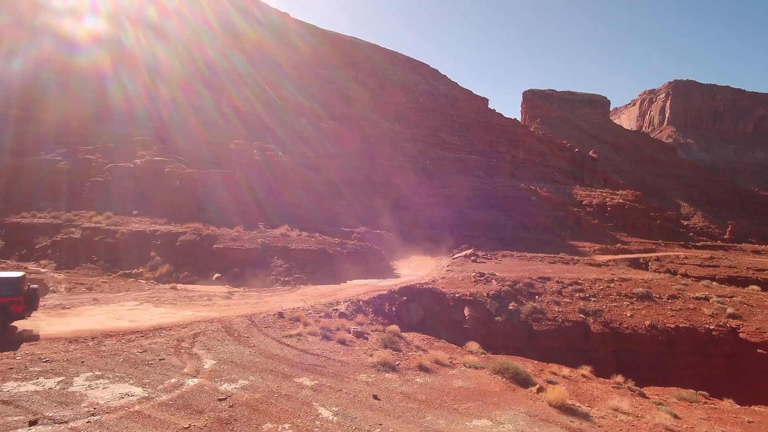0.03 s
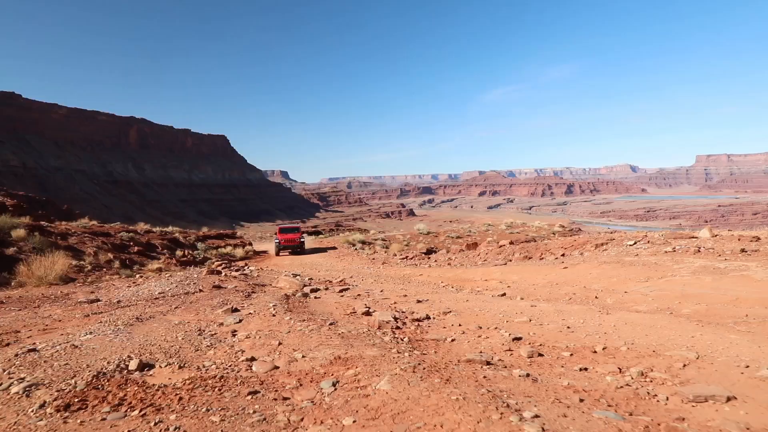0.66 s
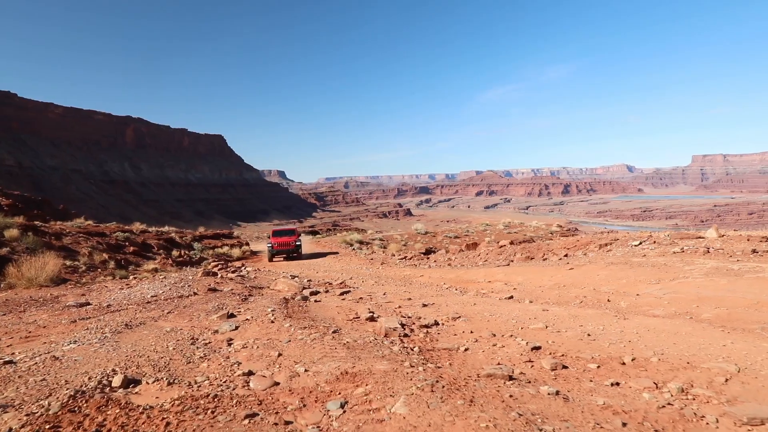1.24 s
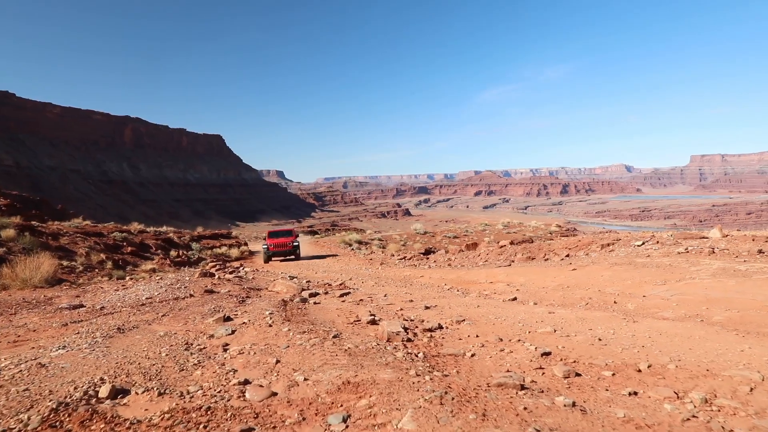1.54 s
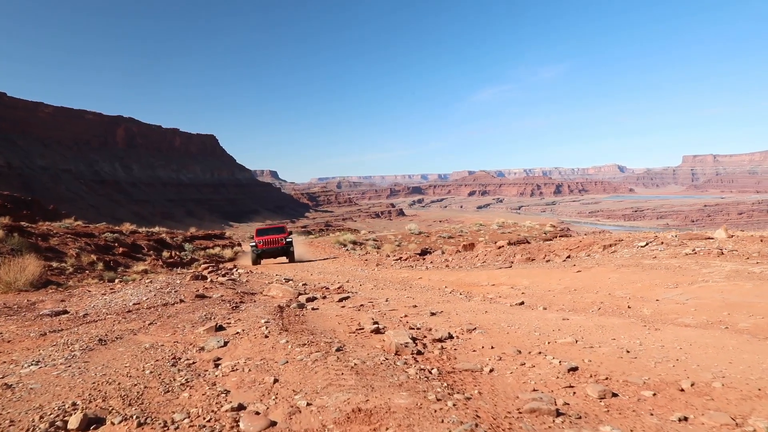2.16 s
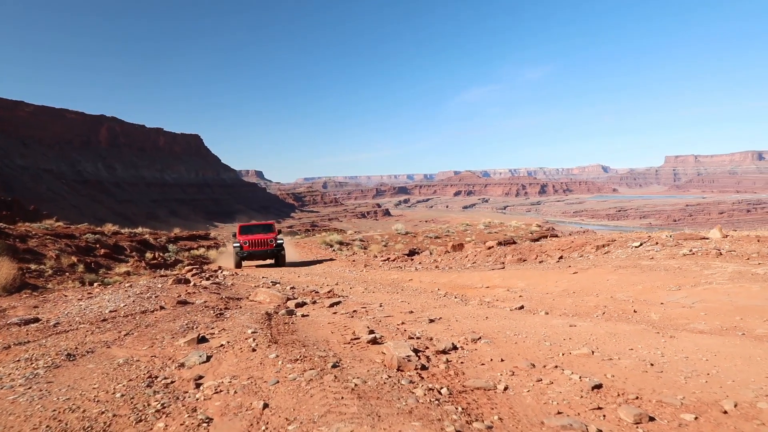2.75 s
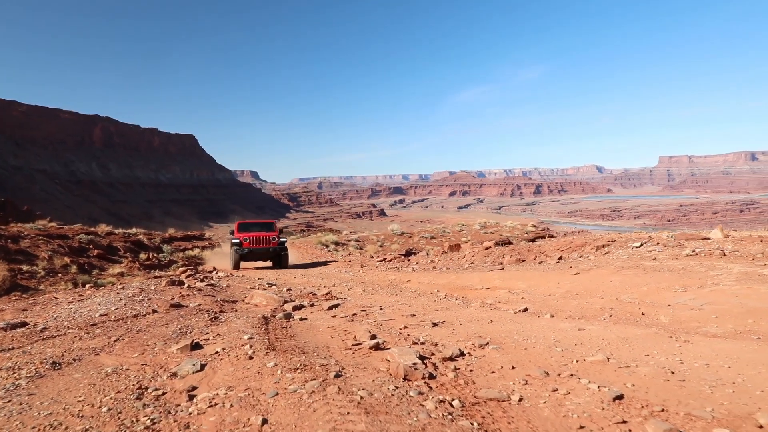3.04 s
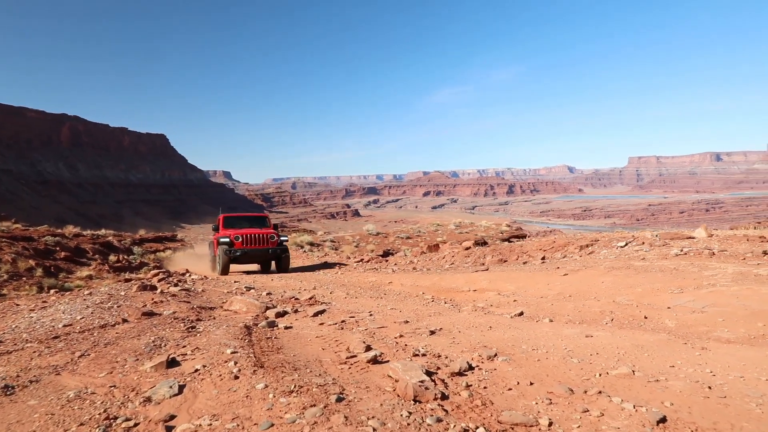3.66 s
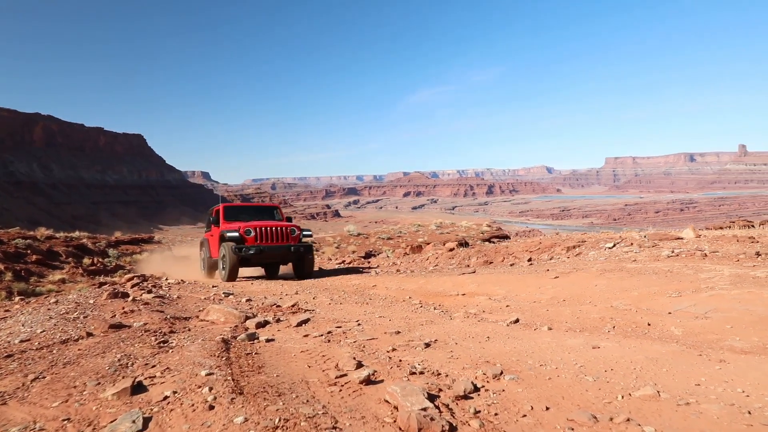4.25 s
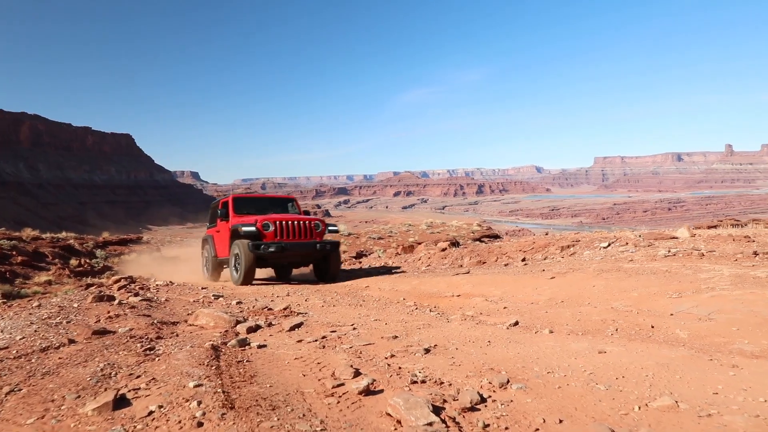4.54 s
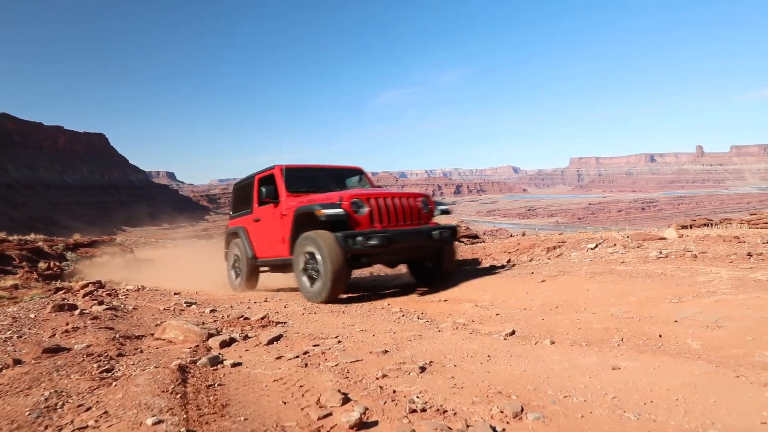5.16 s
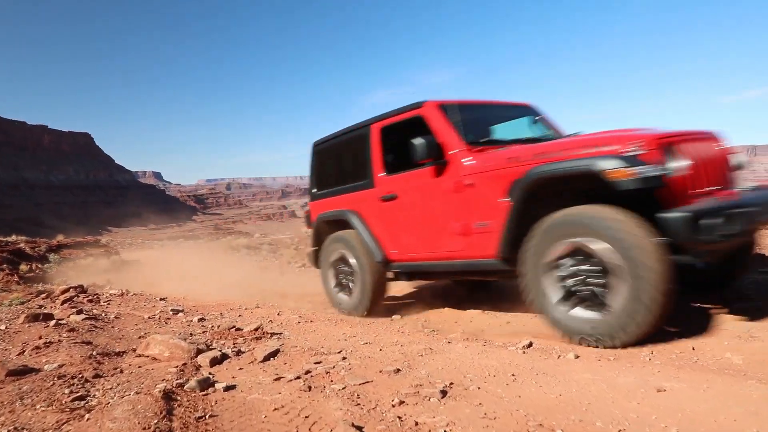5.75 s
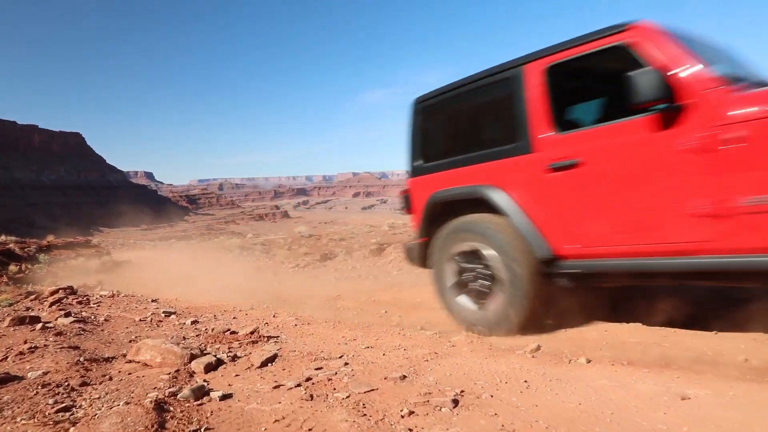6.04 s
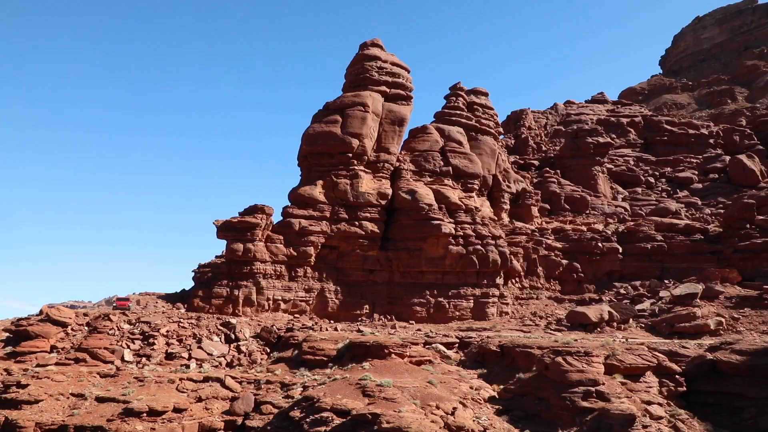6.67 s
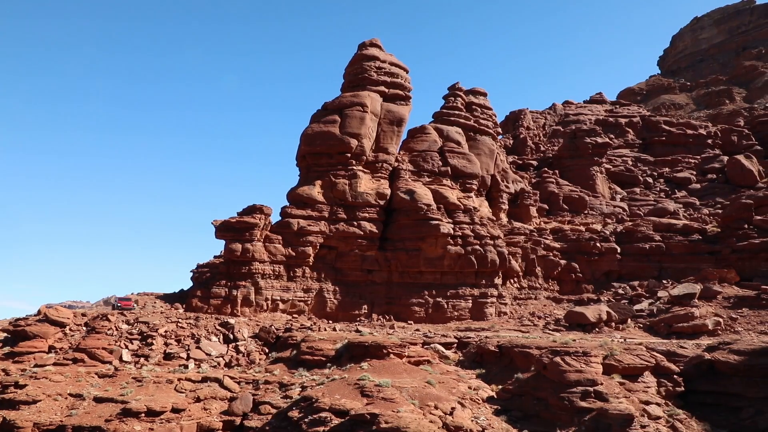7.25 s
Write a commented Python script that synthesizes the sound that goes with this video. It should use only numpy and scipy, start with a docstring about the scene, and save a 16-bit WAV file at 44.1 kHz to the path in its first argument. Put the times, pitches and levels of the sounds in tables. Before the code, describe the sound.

Gravel crunches and stones pop louder as an off-road vehicle hums up and drives close by, then everything cuts to near silence.

```python
"""A stony desert trail. A four-wheel-drive comes up and passes close: tyres thud, crush gravel and pop
stones over a surging engine hum, a singing intake and a hiss of sand; jolts ring the chassis.
Distance and loose ground set the tyre levels. While it is far off, something scuffs the grit nearby.
The drive-by starts and stops abruptly. A still canyon follows, with faint ticks and the soft bumps
of a hand on a camera body."""
import sys
import numpy as np
from scipy import signal
from scipy.fft import rfft, irfft, next_fast_len
from scipy.io import wavfile
from scipy.ndimage import uniform_filter1d, map_coordinates

SR = 44100
rng = np.random.default_rng(int(sys.argv[2]) if len(sys.argv) > 2 else 0)


def transcribe(u):
    """Save the signal u as a 16-bit wav file named by the first command-line argument.

    u: samples, shape (n,) or (channels, n), limited to [-1, 1]; the rate is SR.
    q: integer samples, one column per channel.
    """
    v = np.clip(np.atleast_2d(u).T, -1, 1)
    q = np.round(v * 32767).astype(np.int16)
    wavfile.write(sys.argv[1], SR, q)


N = 326340

START_S, STOP_S = 0.740, 6.747
SPEED_M_PER_S, CLOSEST_M, PASS_S = 4.93, 2.69, 6.01  # straight line, steady speed
TAIL_TURN_S = 0.25  # side-on to tail-on

# Canyon air spectrum: freq_hz, gain_db
AIR_EQ = [(20, -15.5), (90, 7), (230, -10), (370, 0.5), (520, -5), (800, -19), (930, -10.5), (1350, -13.5),
          (1700, -13.5), (2550, -13.5), (3400, -27.5), (5800, -39), (6700, -37), (7400, -33), (8200, -41),
          (11000, -37), (15000, -53)]
# Low wind spectrum: freq_hz, gain_db
BREEZE_EQ = [(12, -13), (25, -5), (45, 0), (95, 0.5), (140, 2.5), (300, -36.5)]
# Faint tones on the trail: pitch_hz, width_hz, level_db
TRAIL_TONES = [(2490, 150, -58), (4200, 200, -70)]
# Engine speed: time_s, firing_hz
REVS = [(0.76, 65), (1.6, 67.2), (2.55, 67.46), (2.95, 71.96), (3.25, 75.67), (3.95, 69.26), (4.6, 68.07),
        (4.85, 65.13), (5.4, 60.83), (5.87, 61.55), (5.96, 60.45), (6.03, 58), (6.08, 54.9), (6.14, 54.5),
        (6.22, 57.32), (6.35, 57.85), (6.42, 56.03), (6.52, 54.7), (6.6, 55.8), (6.72, 59)]
# Surge of the firing note: time_s, level_db
SURGE = [(0.76, -52), (1.19, -48), (1.37, -65), (1.47, -44), (1.72, -59), (1.95, -47), (2.5, -53),
         (3.02, -40), (3.33, -56), (3.55, -43.5), (3.93, -45), (4.68, -38), (4.73, -46), (4.89, -34.5),
         (4.97, -44), (5.11, -31), (5.14, -43), (5.36, -32), (5.51, -45), (5.85, -28), (6.07, -47),
         (6.22, -30), (6.52, -49), (6.72, -32)]
# Exhaust overtones: order, front_db, side_db, rear_db
EXHAUST_ORDERS = [(2, -16.5, -13, -2.5), (3, -15, 2, 2.5), (4, -11.5, 6, -13), (5, -19.5, -9, -4.5)]
# Exhaust booms: peak_s, decay_s, level_db
EXHAUST_BOOMS = [(1.05, 0.044, -47), (2.2, 0.2, -45.5), (2.88, 0.13, -44), (4.86, 0.05, -34.5)]
# Intake note: time_s, level_db
INTAKE_LEVEL = [(0.76, -52), (2.6, -47), (3.2, -33), (3.5, -49), (4.1, -37.5), (4.45, -39), (4.66, -34),
                (5.15, -35.5), (5.4, -37), (5.8, -50)]
# Thin whistle: time_s, pitch_hz, level_db
WHISTLE_PATH = [(0.78, 5590, -64), (0.92, 5630, -64), (1.02, 5630, -67), (1.42, 5600, -76.5),
                (1.55, 5590, -63), (1.95, 5535, -64), (2.08, 5590, -67), (2.25, 5620, -72),
                (2.38, 5625, -66), (2.58, 5565, -67), (2.95, 5540, -68), (3.5, 5595, -63), (4.1, 5520, -64),
                (6.4, 5530, -67), (6.55, 5510, -60)]
# Looseness of the ground, heard as hiss: time_s, spray_db
LOOSE_GROUND = [(0.76, -56.5), (0.95, -59), (1.2, -57.5), (1.9, -57.5), (2.1, -52), (2.45, -53),
                (2.85, -51.5), (3.05, -48.5), (3.35, -48.5), (3.85, -48.5), (4.15, -44.5), (5.0, -43),
                (5.2, -43), (5.85, -42.5), (6.12, -46), (6.32, -43.5), (6.46, -47.5), (6.74, -43.5)]
# Thudding from rocks in the track: time_s, gain_db
ROCK_GAIN = [(1.75, 0.5), (2.05, 3), (3.5, -2), (4.4, -1), (4.8, 1), (5.6, 1)]
# Tyre carcass spectrum: freq_hz, gain_db
THUD_EQ = [(10, -53), (24, -20), (45, -18), (62, -11), (90, -1), (125, 0), (180, 2), (270, -1.5), (380, -1),
           (520, -3.5), (900, -25), (3000, -120)]
# Far gravel spectrum: freq_hz, gain_db
GRAVEL_FAR_EQ = [(15, -57), (150, -36.5), (330, -1.5), (450, -1.5), (620, 5), (790, 1.5), (960, 6.5),
                 (1400, 1), (1800, -11), (2300, -7.5), (3000, -23), (6000, -44), (12000, -120)]
# Near gravel spectrum: freq_hz, gain_db
GRAVEL_NEAR_EQ = [(15, -45), (150, -17.5), (330, -8.5), (460, -3.5), (660, 1.5), (830, -3), (1000, -2.5),
                  (1400, 0), (1800, -1), (2080, -9), (2450, -20), (3000, -13.5), (6000, -66), (12000, -120)]
# Grit spectrum: freq_hz, gain_db
GRIT_EQ = [(100, -78), (1200, -25.5), (2000, 2), (2500, 5.5), (2850, 1), (3300, 1), (3900, -2.5),
           (4400, -5), (5200, -18.5), (7000, -17), (16000, -82)]
# Far sand spectrum: freq_hz, gain_db
SAND_FAR_EQ = [(300, -101), (3000, 0), (4800, 0), (5400, -5.5), (6200, -5), (6750, -1), (7400, -2),
               (8500, -2), (9200, 2), (9900, 0.5), (10500, 1), (12200, -10), (13600, -13), (15600, -19.5)]
# Near sand spectrum: freq_hz, gain_db
SAND_NEAR_EQ = [(300, -58), (3000, -3), (4800, -2.5), (5500, -6.5), (7400, -3.5), (10000, -3.5),
                (11200, -4.5), (12400, -12), (15600, -27)]
# Pebbles and grit landing: start_s, level_db, low_hz, high_hz
PEBBLE_TICKS = [(0.8145, -34, 2500, 11000), (1.475, -34, 1500, 7000), (1.506, -30, 1800, 8500),
                (1.828, -34.5, 2000, 6000), (2.146, -31.5, 1710, 3570), (2.635, -34, 1500, 7000),
                (3.667, -33, 1800, 3400), (4.121, -27, 1800, 3600), (4.167, -28, 1700, 4200),
                (4.775, -28.5, 9300, 13400), (5.417, -17, 1300, 2800), (5.487, -26, 2000, 4500),
                (5.567, -27, 2204, 4000), (6.077, -25, 2000, 4400), (6.085, -30, 6464, 13000),
                (6.297, -37, 7500, 11000), (6.426, -29, 2500, 7000), (6.769, -66, 7410, 11500),
                (6.898, -68, 6800, 10500), (6.963, -61, 6200, 11000), (7.042, -64, 6500, 10800),
                (7.121, -56, 6200, 11500), (7.127, -60, 6200, 11500), (7.333, -65, 6300, 9500)]
# Stones snapping from under the tread: start_s, level_db, pitch_hz, rattle_db
STONE_POPS = [(0.815, -11.5, 1320, -47), (1.229, -18, 1080, -38), (1.5786, -18, 840, -47),
              (2.2657, -15, 890, -28), (2.499, -12, 1200, -36), (2.6371, -14, 1170, -38),
              (3.1905, -17, 840, -31), (3.6368, -3.5, 626, -32), (3.979, -11, 1110, -43),
              (3.9932, -7, 950, -43), (4.1203, -12, 1120, -30), (4.3821, -6, 1300, -47),
              (4.41, -11, 980, -47), (4.553, -7.5, 790, -25.5), (4.6005, -10, 1060, -41),
              (4.6759, -8, 597, -29), (4.79, -3.5, 1040, -45), (4.8214, -10, 575, -45),
              (4.96, -11, 1300, -40), (5.0524, -4.5, 1060, -34), (5.076, -7, 900, -22),
              (5.1481, -7, 1170, -23.5), (5.33, -6.5, 1103, -34), (5.427, -23, 1090, -24),
              (5.4832, -6.5, 1290, -21.5), (5.74, -14.5, 520, -40), (5.7592, -11, 1040, -39.5),
              (5.814, -4.5, 910, -28), (5.9803, -3.5, 755, -29.5), (6.037, -7.5, 690, -26),
              (6.0804, -5.5, 1180, -47), (6.1783, -5, 636, -45), (6.4266, -4, 950, -32),
              (6.463, -13, 619, -38)]
# Stone crack spectrum: freq_hz, gain_db
CRACK_EQ = [(20, -57), (150, -43), (500, 26), (1500, -15), (3000, -14), (5500, 11), (16000, -42)]
# Shifting gravel spectrum: freq_hz, gain_db
RATTLE_EQ = [(20, -39), (200, -18.5), (550, 2), (800, -1.5), (1400, 0), (2100, -8), (4000, -22),
             (16000, -92)]
# Scuffs on nearby grit: peak_s, decay_s, scrape_db, rattle_db, high_hz
GRIT_SCUFFS = [(0.816, 0.012, -40.5, -41, 9000), (1.013, 0.047, -52, -40, 12000),
               (1.474, 0.011, -37, -37, 17000), (1.496, 0.0059, -34.5, -42, 17000),
               (1.511, 0.0047, -40, -31.5, 17000), (1.637, 0.035, -48, -37, 17000),
               (1.838, 0.013, -36.5, -33, 7360), (2.14, 0.12, -53, -37, 14000),
               (2.648, 0.015, -39, -32, 11000), (6.978, 0.017, -70, -60, 11000)]
# Scrape spectrum: freq_hz, gain_db
SCUFF_EQ = [(30, -60), (400, -29), (1200, 0.5), (2800, 7), (5000, -8), (7000, -4.5), (10000, -8),
            (13000, -11), (15500, -30)]
# Stones grinding under a wheel: peak_s, decay_s, level_db, pitch_hz
STONE_GRINDS = [(1.028, 0.014, -36.5, 1400), (1.297, 0.012, -39, 1250), (1.63, 0.02, -38, 1050),
                (2.269, 0.014, -34, 1200)]
# Short grit sprays and two long bands of high hiss: peak_s, decay_s, level_db, centre_hz, width_hz
SIZZLE_BANDS = [(1.645, .03, -56, 11700, 2400), (2.06, 0.03, -54, 9300, 2000),
                (2.19, .03, -59, 11200, 2500), (2.8, .03, -60, 12000, 2500), (3.02, 0.013, -47, 3000, 1600),
                (3.176, 0.0065, -47, 9000, 5000), (3.23, .02, -46, 3000, 1400),
                (3.9, 0.83, -52.5, 10450, 1100), (4.13, .03, -49, 10500, 7000),
                (4.5, 0.46, -57.5, 6750, 500), (5.49, .03, -47, 9000, 4000),
                (5.812, 0.022, -33.5, 3200, 2090), (5.815, .03, -45, 7800, 5000),
                (5.93, 0.032, -46, 8500, 6000), (6.976, .025, -76, 8500, 4500)]
# Struck chassis parts: start_s, level_db, pitch_hz, ring_cycles
CHASSIS_PINGS = [(3.671, -17, 436, 12), (3.857, -17.5, 2620, 24), (5.19, -28, 3270, 220),
                 (6.03, -13.5, 660, 34), (6.112, -8, 268, 6.9), (6.18, -16.5, 454, 81),
                 (6.236, -29.5, 4500, 190), (6.428, -23, 456, 90), (6.429, -20, 685, 50)]
# Metallic wheel rasp: peak_s, decay_s, level_db
WHEEL_RASP = [(5.25, 0.21, -43.5)]
# Tread hum of the near wheel: time_s, pitch_hz, level_db
TREAD_PATH = [(5.8, 287, -76), (5.87, 289.8, -33), (5.93, 282, -29.5), (6.0, 261, -31), (6.05, 256, -33),
              (6.12, 250, -70)]
# Faint tones in the canyon: pitch_hz, width_hz, level_db
STILL_TONES = [(345, 9, -67), (430, 14, -70), (915, 20, -76), (2460, 40, -76)]
# Hand on the camera body: start_s, level_db, pitch_hz
HAND_BUMPS = [(6.751, -34, 151.6), (6.807, -36.5, 132.5), (7.061, -26.5, 149), (7.098, -37, 140),
              (7.125, -36, 140), (7.235, -31.5, 194), (7.286, -31.5, 189)]

# Layer level laws: base_db, distance_share, spray_share, rear_gain_db
THUD_LAW = (-29, 0.64, 0.23, 2.7)
GRAVEL_LAW = (-25.5, 0.3963, 0.605, 0.04)
GRIT_LAW = (-33, 0.77, 0.94, -2)
DRONE_LAW = (-39.5, 1.3, -1, 6.5)


def amp(db):
    """Decibels to gain."""
    return 10 ** (np.asarray(db) / 20)


def unit(x):
    """Scale to rms 1."""
    return x / np.sqrt(np.mean(x ** 2) + 1e-20)


def clock():
    """Sample times in seconds."""
    return np.arange(N) / SR


def curves(rows):
    """One value per sample for each column after the time."""
    times_s, *columns = np.transpose(rows)
    return [np.interp(clock(), times_s, column) for column in columns]


def wobble(rate_hz):
    """Smooth random curve, rate_hz knots a second."""
    return map_coordinates(rng.standard_normal(4096), [clock() * rate_hz], mode="wrap")


def noise():
    """White noise, rms 1."""
    return rng.standard_normal(N)


def colour(x, spectrum):
    """Minimum-phase filter shaped by (freq_hz, gain_db) rows; output rms 1."""
    size = 2 * next_fast_len(N // 2 + 8192)
    hz, db = np.transpose(spectrum)
    gain = amp(np.interp(np.log(np.fft.rfftfreq(size, 1 / SR) + 1), np.log(hz), db))
    cepstrum = irfft(np.log(np.maximum(gain, 1e-6)))
    cepstrum[1:size // 2] *= 2
    cepstrum[size // 2 + 1:] = 0
    return unit(irfft(rfft(x, size) * np.exp(rfft(cepstrum)))[:N])


def band(x, low_hz, high_hz, order=3):
    """Butterworth band-pass."""
    return signal.sosfilt(signal.butter(order, [low_hz, high_hz], "bandpass", fs=SR, output="sos"), x)


def add(track, start_s, sound):
    """Mix a short sound into the track."""
    part = track[round(start_s * SR):][:len(sound)]
    part += sound[:len(part)]


def impacts(rate_hz, spread_db):
    """Randomly timed kicks of random size and sign, rms 1."""
    hit = rng.random(N) < rate_hz / SR
    size_db = spread_db * np.minimum(rng.exponential(size=N), 4)
    return unit(hit * np.sign(noise()) * amp(size_db))


def swells(rows, rise=1):
    """Bell envelopes from (peak_s, decay_s, level_db) rows; rise is attack time over decay time."""
    power = np.zeros(N)
    for peak_s, decay_s, db in rows:
        start_s = max(0, peak_s - 4 * decay_s)
        t = np.arange(start_s - peak_s, 4 * decay_s, 1 / SR)
        width_s = np.where(t < 0, rise * decay_s, decay_s)
        add(power, start_s, amp(db) ** 2 * np.exp(-(t / width_s) ** 2))
    return np.sqrt(power)


def knock(hz, cycles):
    """Damped ring, down 60 dB after the given cycles."""
    turns = np.arange(0, cycles, hz / SR)
    return np.sin(2 * np.pi * turns) * 10 ** (-3 * turns / cycles)


def fuzzy_tone(hz, width_hz):
    """Noise in one resonance, rms 1."""
    phase = 2 * np.pi * hz * clock()
    return unit(wobble(width_hz) * np.cos(phase) + wobble(width_hz) * np.sin(phase))


def distance_loss_db():
    """The vehicle's 1/distance loss relative to its nearest point."""
    return 20 * np.log10(np.hypot(1, SPEED_M_PER_S * (clock() - PASS_S) / CLOSEST_M))


def layer_db(law, spray_db, full_spray_db=-44):
    """Level of a vehicle layer from distance, loose ground and facing."""
    base_db, distance_share, spray_share, rear_gain_db = law
    behind = np.clip((clock() - PASS_S) / TAIL_TURN_S, 0, 1)
    ground_db = spray_share * (spray_db - full_spray_db)
    return base_db - distance_share * distance_loss_db() + ground_db + rear_gain_db * behind


def air():
    """Faint, wavering wash of canyon air."""
    return amp(-56.5 + 1.4 * wobble(3.92)) * colour(noise(), AIR_EQ)


def breeze():
    """Low wind over the open trail."""
    return amp(-51.5 + 1.6 * wobble(5.13)) * colour(noise(), BREEZE_EQ)


def trail_tones():
    """Faint, high, fluttering tones."""
    return sum(amp(db + 2.6 * wobble(16)) * fuzzy_tone(hz, width_hz) for hz, width_hz, db in TRAIL_TONES)


def engine():
    """Surging hum at the firing rate; exhaust and intake lock to its phase."""
    firing_hz, = curves(REVS)
    surge_db, = curves(SURGE)
    phase = 2 * np.pi * np.cumsum(firing_hz * (1 + 0.0051 * wobble(21.92))) / SR
    hum = amp(surge_db + 1 + 1.2 * wobble(15)) * np.sin(phase)
    return hum + exhaust(firing_hz, phase) + intake(firing_hz, phase)


def exhaust(firing_hz, phase, throttle_db=1, full_climb_hz_per_s=4.9, boom_order=3):
    """Overtones growl as revs climb and shift from front to side to rear; one booms briefly."""
    climb_hz_per_s = uniform_filter1d(np.gradient(firing_hz) * SR, size=SR // 5)
    throttle = np.clip(climb_hz_per_s / full_climb_hz_per_s, 0, 1)
    growl_db = -34.5 - 0.27 * distance_loss_db() + throttle_db * throttle
    sound = np.zeros(N)
    for order, *aspect_db in EXHAUST_ORDERS:
        facing_db = np.interp(clock() - PASS_S, [-TAIL_TURN_S, 0, TAIL_TURN_S], aspect_db)
        level = amp(growl_db + facing_db + 0.84 * wobble(21))
        if order == boom_order:
            level += swells(EXHAUST_BOOMS)
        sound += level * np.sin(order * phase + rng.uniform(0, 2 * np.pi))
    return sound


def intake(firing_hz, phase, resonance_hz=544.5, width_hz=52):
    """Overtones sing as they cross the intake resonance."""
    level_db, = curves(INTAKE_LEVEL)
    level = amp(level_db + 2.2 * wobble(18))
    sound = np.zeros(N)
    for order in (7, 8, 9):
        flutter = wobble(60) * np.sin(order * phase) + wobble(60) * np.cos(order * phase)
        response = 1 / np.hypot(1, 2 * (order * firing_hz - resonance_hz) / width_hz)
        sound += level * response * (np.sin(order * phase) + 0.36 * flutter)
    return sound


def whistle():
    """Thin, flickering tone that drifts in pitch."""
    hz, level_db = curves(WHISTLE_PATH)
    level = amp(level_db + 2.5 * wobble(14))
    return level * np.sin(2 * np.pi * np.cumsum(hz + 42 * wobble(110)) / SR)


def pebbles(rate_hz, spread_db, cycles, low_hz, span):
    """Stones clack together, each at its own pitch from low_hz to span times that; rms 1."""
    draws = rng.random((4000, 3))[:int(rate_hz * N / SR)]
    clacks = np.zeros(N)
    for when, smallness, softness in draws:
        hz = low_hz * span ** smallness
        level = np.sqrt(hz) * amp(-spread_db * np.log(softness + 0.0077))
        add(clacks, when * (N - 1) / SR, level * knock(hz, cycles))
    return unit(clacks)


def tyres():
    """Rocks thud in the carcass, gravel cracks under the tread, grit and sand spray off it."""
    spray_db, = curves(LOOSE_GROUND)
    rocks_db, = curves(ROCK_GAIN)
    closeness = amp(-distance_loss_db())
    near_mix = np.clip(0.37 + 0.58 * closeness, 0, 1)
    bite = wobble(32)  # uneven tread load, common to all layers
    thuds = colour(impacts(rate_hz=420, spread_db=2) + 0.5 * noise(), THUD_EQ)
    cracks = impacts(rate_hz=1500, spread_db=4) + 1.35 * noise()
    cracks += 0.33 * pebbles(rate_hz=340, spread_db=3, cycles=31, low_hz=445.5, span=8.8)
    gravel = (1 - near_mix) * colour(cracks, GRAVEL_FAR_EQ) + near_mix * colour(cracks, GRAVEL_NEAR_EQ)
    grains = impacts(rate_hz=2500, spread_db=-3.5) + 0.5 * cracks + 1.6 * noise()
    grains += 0.43 * pebbles(rate_hz=220, spread_db=3, cycles=61, low_hz=2000, span=2.566)
    grit = colour(grains, GRIT_EQ)
    sand = impacts(rate_hz=3600, spread_db=5) + 1.85 * noise()
    sand += 0.47 * pebbles(rate_hz=330, spread_db=2, cycles=69, low_hz=5000, span=2.81)
    hiss = (1 - closeness ** 2) * colour(sand, SAND_FAR_EQ) + closeness ** 2 * colour(sand, SAND_NEAR_EQ)
    return (amp(layer_db(THUD_LAW, spray_db) + rocks_db + 0.65 * bite) * thuds
            + amp(layer_db(GRAVEL_LAW, spray_db) + 0.74 * bite + 0.42 * wobble(70)) * gravel
            + amp(layer_db(GRIT_LAW, spray_db) + 0.321 * bite + 0.95 * wobble(45)) * grit
            + amp(spray_db + 0.5 + 0.18 * bite + 0.62 * wobble(130)) * hiss)


def hollow_drone(side_on_db=-6):
    """Fuzzy, hollow drone as the vehicle approaches; dips side-on."""
    spray_db, = curves(LOOSE_GROUND)
    side_on = amp(-2 * distance_loss_db())
    level_db = layer_db(DRONE_LAW, spray_db) + side_on_db * side_on + 1.1 * wobble(6.4)
    return amp(level_db) * fuzzy_tone(hz=546, width_hz=40)


def ticks(t60_s=0.018):
    """Pebbles and grit land with short, bright clicks."""
    sound = np.zeros(N)
    t = np.arange(SR // 8) / SR
    for start_s, db, low_hz, high_hz in PEBBLE_TICKS:
        burst = unit(band(rng.standard_normal(len(t)), low_hz, high_hz))
        add(sound, start_s, amp(db - 60 * t / t60_s) * burst)
    return sound


def rattle():
    """Dense clatter of gravel giving way, rms 1."""
    return colour(impacts(rate_hz=1500, spread_db=4) + 0.35 * noise(), RATTLE_EQ)


def stone_pops(crack_t60_s=0.021, chip_window_s=0.00711, rattle_s=0.012):
    """Each stone pops with a dead knock and sheds three chips; the gravel around it collapses."""
    knocks, crack_envelope = np.zeros(N), np.zeros(N)
    t = np.arange(SR // 8) / SR
    for start_s, db, hz, _ in STONE_POPS:
        add(knocks, start_s, amp(db - 3) * knock(hz, cycles=6.1))
        add(crack_envelope, start_s, amp(db - 31 - 60 * t / crack_t60_s))
        for delay, smallness in rng.random((3, 2)):
            chip = knock(hz * (0.766 + 0.84 * smallness), cycles=11.4)
            add(knocks, start_s + chip_window_s * delay, amp(db - 14.5) * chip)
    cracks = crack_envelope * colour(noise(), CRACK_EQ)
    muffled = band(knocks + cracks, 100, 3400, order=4)  # rubber softens the contact
    collapse = swells([(start_s, rattle_s, db) for start_s, _, _, db in STONE_POPS], rise=0.7)
    return muffled + collapse * rattle()


def scuffs():
    """Dry scrapes of dense, tiny grains over the rattle of the gravel they shift."""
    grains = colour(impacts(rate_hz=4000, spread_db=5) + 0.5 * noise(), SCUFF_EQ)
    scrape = sum(swells([(peak_s, decay_s, db)]) * band(grains, 200, high_hz)
                 for peak_s, decay_s, db, _, high_hz in GRIT_SCUFFS)
    shift = swells([(peak_s, decay_s, db) for peak_s, decay_s, _, db, _ in GRIT_SCUFFS])
    return scrape + shift * rattle()


def grinds():
    """A stone turns under the tread and rubs its neighbours in one broad resonance."""
    return sum(swells([(peak_s, decay_s, db)]) * fuzzy_tone(hz, width_hz=520)
               for peak_s, decay_s, db, hz in STONE_GRINDS)


def sizzles():
    """Short sprays of grit, plus two long, narrow bands of high hiss."""
    fizz = impacts(rate_hz=1700, spread_db=0) + 0.4 * noise()
    return sum(swells([(peak_s, decay_s, db)]) * unit(band(fizz, hz - width_hz / 2, hz + width_hz / 2))
               for peak_s, decay_s, db, hz, width_hz in SIZZLE_BANDS)


def chassis(cutoff_hz=6000):
    """Jolts and flung pebbles ring steel parts."""
    rings = np.zeros(N)
    for start_s, db, hz, cycles in CHASSIS_PINGS:
        add(rings, start_s, amp(db) * knock(hz, cycles))
    return signal.sosfilt(signal.butter(4, cutoff_hz, fs=SR, output="sos"), rings)


def wheel_rasp():
    """Narrow metallic rasp as the near wheel comes up."""
    return swells(WHEEL_RASP) * amp(2.9 * wobble(35)) * fuzzy_tone(hz=3275, width_hz=200)


def tread_hum():
    """Tread blocks hum on a falling note as the near wheel sweeps by."""
    hz, level_db = curves(TREAD_PATH)
    return amp(level_db + wobble(28)) * np.sin(2 * np.pi * np.cumsum(hz) / SR)


def canyon_tones():
    """Faint, steady tones in the still air."""
    return sum(amp(db) * fuzzy_tone(hz, width_hz) for hz, width_hz, db in STILL_TONES)


def hand_bumps(attack_s=0.0012, rebound_s=0.0094, rebound_db=-6):
    """A hand bumps the camera body; the housing rocks twice more, weaker each time."""
    bumps = np.zeros(N)
    for start_s, db, hz in HAND_BUMPS:
        thud = knock(hz, cycles=2.8)
        thud *= 1 - np.exp(-np.arange(len(thud)) / (attack_s * SR))
        for rebound in range(3):
            delay_s = rebound * rebound_s * rng.uniform(0.764, 1.4)
            add(bumps, start_s + delay_s, amp(db + 10 + rebound * rebound_db) * thud)
    return band(bumps, 45, 850, order=2)  # flesh softens the contact


def scene():
    """Drive-by on the breezy trail, then the still canyon; mono."""
    t = clock()
    vehicle = engine() + whistle() + tyres() + hollow_drone() + tread_hum() + wheel_rasp()
    vehicle += stone_pops() + grinds() + chassis()
    trail = vehicle + breeze()
    nearby = air() + scuffs() + ticks() + sizzles()
    mix = np.where(t < STOP_S, trail + trail_tones(), canyon_tones()) + nearby + hand_bumps()
    return (mix * (t > START_S))[None]


def record(dry, cutoff_hz=15780):
    """Steep low-pass at the band limit."""
    return signal.fftconvolve(dry, signal.firwin(601, cutoff_hz, fs=SR)[None], mode="same")


dry = scene()
out = record(dry)
transcribe(out)
```